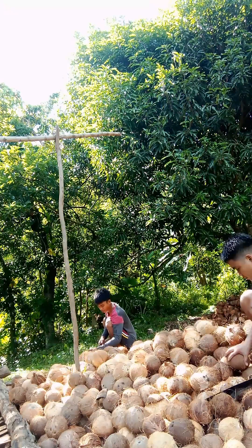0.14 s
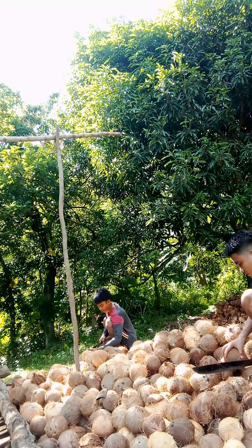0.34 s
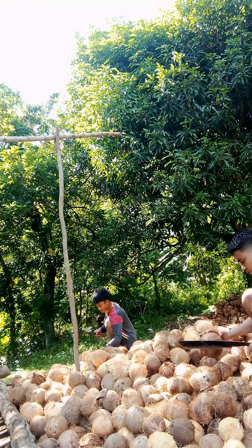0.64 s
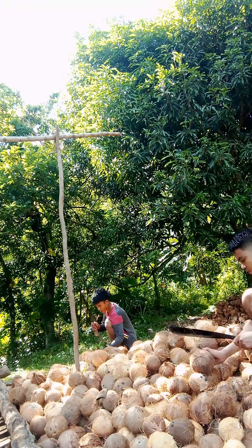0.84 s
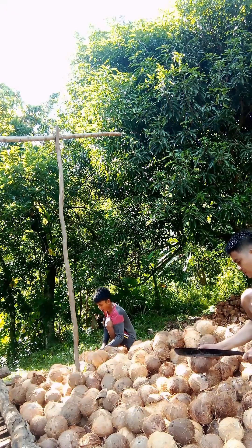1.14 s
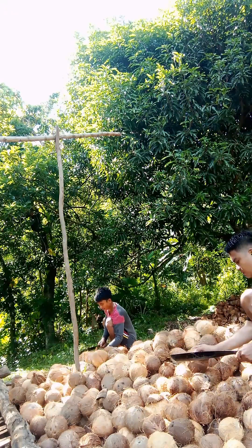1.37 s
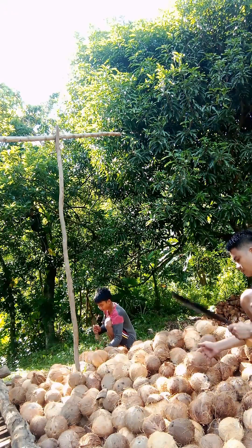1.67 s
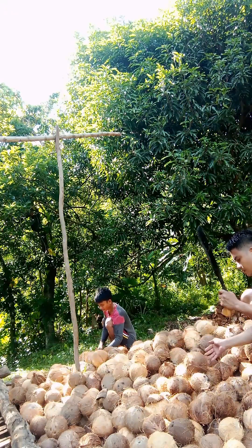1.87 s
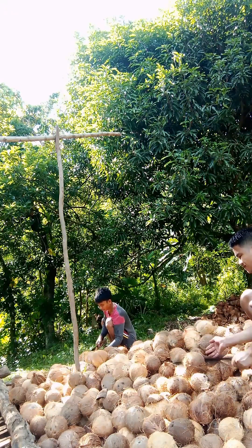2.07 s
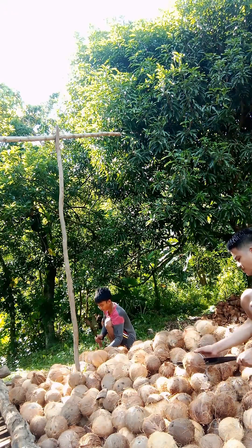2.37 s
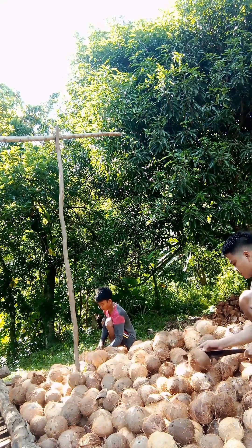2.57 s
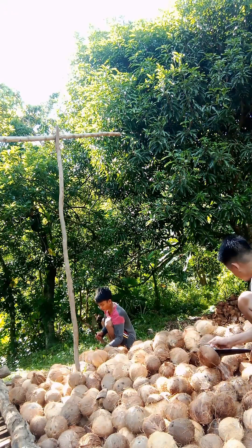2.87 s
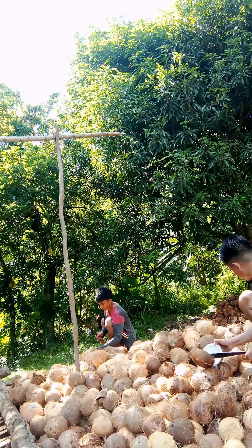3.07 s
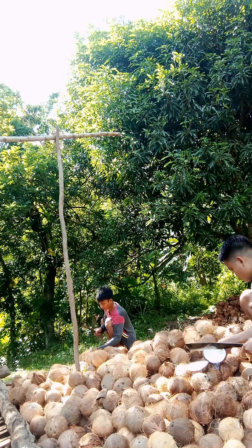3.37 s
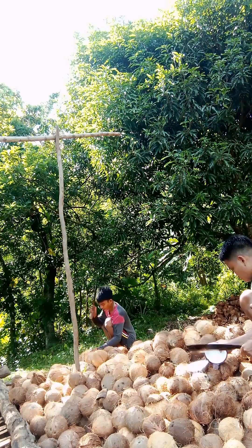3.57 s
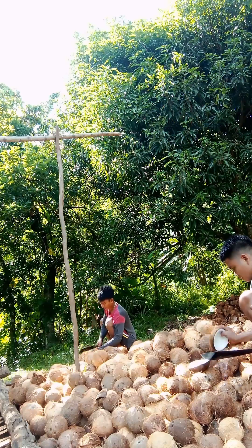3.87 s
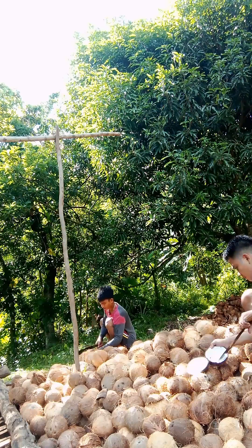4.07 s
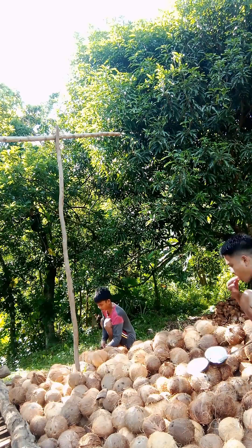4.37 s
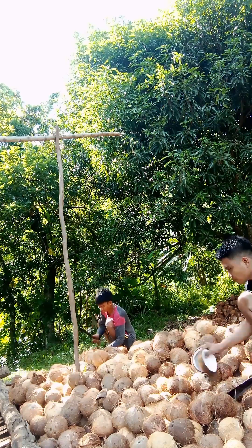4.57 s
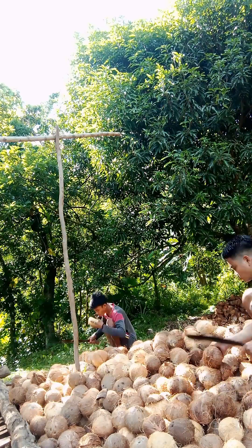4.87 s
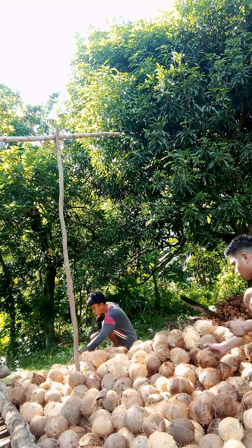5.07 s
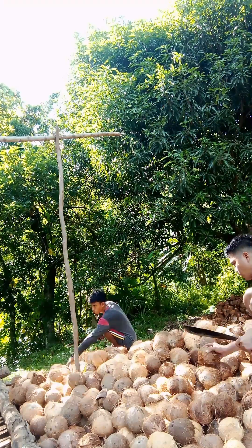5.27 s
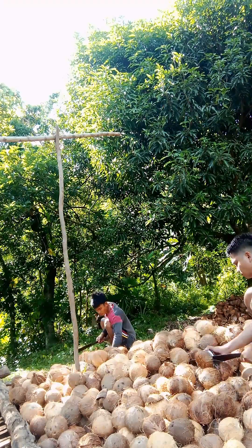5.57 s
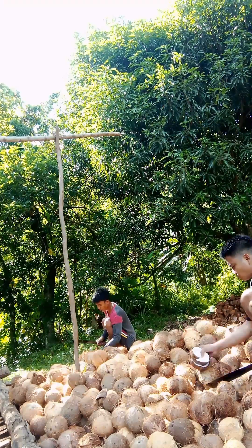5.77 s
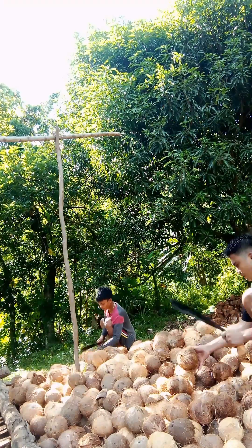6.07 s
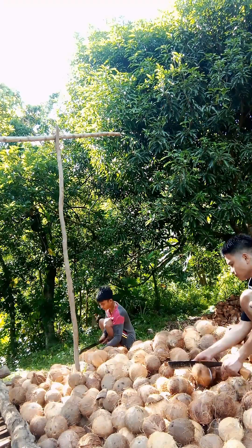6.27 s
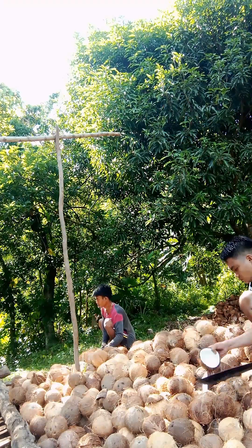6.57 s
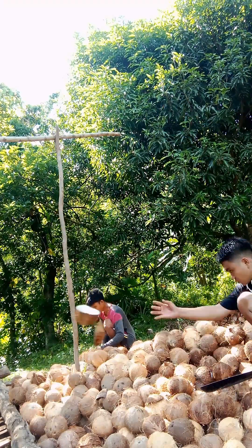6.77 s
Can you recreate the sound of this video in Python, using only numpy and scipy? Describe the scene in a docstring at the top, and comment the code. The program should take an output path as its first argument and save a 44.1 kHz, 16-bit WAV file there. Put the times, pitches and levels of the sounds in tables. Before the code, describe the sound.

In an open yard ringed by trees, knives chop husked coconuts with dry, hollow cracks at uneven intervals. Nuts thud and tumble on the heap, water trickles briefly, and leaves return a soft hissing echo. Around four seconds a tiny dropout leads to crowded, clipped knocks without full tails. Faint insects and rustle continue; the microphone is a few metres away, single-channel.

```python
"""Splitting coconuts in a yard

People split husked coconuts with long knives in a yard ringed by trees; nuts land and tumble on the heap.
Blows are noise bursts driving damped modes; the trees return each as a late, hissing noise echo.
Insects (noise bands), a distant bird (wavering tones), a trickle and drips fill the gaps.
After a short, nearly silent cut the playback skips ahead: blows and echoes come as clipped snatches,
over the same insects, bird, drips and hollow notes."""
import sys
import numpy as np
from scipy import signal
from scipy.fft import rfft, irfft
from scipy.io import wavfile
from scipy.ndimage import uniform_filter1d

SR = 44100
rng = np.random.default_rng(int(sys.argv[2]) if len(sys.argv) > 2 else 0)


def unload_audio(sound):
    """Save the sound as a 16-bit wav file, at the path given as the first command line argument."""
    columns = np.transpose(np.atleast_2d(sound))
    # keep every value between -1 and 1, then stretch to whole-number steps
    steps = np.round(np.clip(columns, -1, 1) * 32767)
    wavfile.write(sys.argv[1], SR, steps.astype(np.int16))


N = 305172

CUT_FROM_S, CUT_TO_S = 3.956, 3.987
KEPT_S, STOP_FADE_S = 0.017, 0.0089  # blow length after the cut; time constant of every abrupt stop


def gain_of(db):
    """Decibels to amplitude."""
    return 10 ** (np.asarray(db) / 20)


def evened(x):
    """Scales to an rms of one."""
    return x / np.sqrt(np.mean(x ** 2) + 1e-20)


def peaked(x):
    """Scales to a peak of one."""
    return x / (abs(x).max() + 1e-20)


def loudest(x):
    """Scales so that the loudest 300 samples (7 ms) have an rms of one."""
    return x / np.sqrt(uniform_filter1d(x ** 2, size=300).max() + 1e-20)


def add(mix, start_s, sound):
    """Adds a sound into the mix at a time, clipped to the end."""
    part = mix[round(start_s * SR):][:len(sound)]
    part += sound[:len(part)]


def coloured(x, hz, db):
    """Shapes a spectrum by straight dB lines on a log-frequency axis."""
    f = np.fft.rfftfreq(len(x), 1 / SR)
    shape_db = np.interp(np.log(f + 1), np.log(hz), db)
    return irfft(rfft(x) * gain_of(shape_db), len(x))


def band(x, lo_hz, hi_hz, skirt_db=-18):
    """One broad band with sloping sides, rms one."""
    corners_hz = [lo_hz / 2, lo_hz, hi_hz, hi_hz * 2, hi_hz * 4]
    return evened(coloured(x, corners_hz, [skirt_db, 0, -3, skirt_db - 10.5, -55]))


def ring(push, hz, t60_s):
    """One damped mode (two-pole resonator) driven by a push."""
    r = 10 ** (-3 / (t60_s * SR))
    return loudest(signal.lfilter([1], [1, -2 * r * np.cos(2 * np.pi * hz / SR), r * r], push))


def stopped(sound, length_s):
    """Fades a sound out abruptly after a given length."""
    over_s = np.maximum(np.arange(len(sound)) / SR - length_s, 0)
    return sound * np.exp(-over_s / STOP_FADE_S)


def wander(count, smooth):
    """Slow random curve, rms one: noise averaged over a number of samples."""
    return evened(uniform_filter1d(rng.standard_normal(count), size=smooth))


def chop(start_s, crack_db, crack_hz, shell_db, shell_hz, thud_db, thud_hz, tick_db, blade_db, echo_db):
    """A knife blow: the harder it lands, the deeper the knife bites and the shorter the nut rings."""
    hard, soft, per_db, hard_db = 0.83, 1.58, 0.1, -16  # length factors against crack level
    long = min(hard + per_db * (hard_db - crack_db), soft)
    return blow(start_s, thud_hz, thud_db, shell_hz, shell_db, crack_hz, crack_db, tick_db, blade_db, echo_db, long)


def blow(start_s, thud_hz, thud_db, shell_hz, shell_db, crack_hz, crack_db, tick_db, blade_db, echo_db, long):
    """Knife or nut strikes a nut: a soft push moves the body, splintering excites shell and blade."""
    # blade modes: mode_hz, relative_db, t60_s
    blade_modes = [(1626, 0, 0.037), (2250, -9, 0.056), (2842, -10, 0.038), (4021, -10, 0.034),
                   (5233, -13, 0.015), (6697, -18, 0.022), (8672, -12, 0.03), (9609, -19, 0.059),
                   (10730, -20, 0.043), (11850, -21, 0.043), (13000, -24, 0.057), (14240, -26, 0.039)]
    t = np.arange(4096) / SR
    long = max(long, .2)
    noise = rng.standard_normal(size=(4, len(t)))
    burst = (1 - np.exp(-t / 0.00027)) ** 2 * np.exp(-t / (0.0032 * long))
    push = np.diff((t / .0008) * np.exp(-t / 0.00071), prepend=0)

    thud = ring(push, thud_hz, 0.037 * long)

    husk = loudest(coloured(noise[3], [120, 300, 1200, 2400], [-21.0, 5.5, 3.5, -50.5]) * burst ** 0.3)
    shell = loudest(ring(noise[0] * burst, shell_hz, 0.016 * long) + 0.58 * husk)

    # torn fibres fill the spectrum around the crack
    fibre_noise = coloured(noise[0], [400, 1300, 4000, 5500, 9000], [-37.5, 5.0, 5, -30.5, -46.5])
    fibres = loudest(fibre_noise * burst)
    crack_push = np.diff(noise[1], prepend=0) * burst
    crack = loudest(ring(crack_push, crack_hz, 0.011 * long) + 0.86 * fibres)

    tick = loudest(coloured(noise[2], [3780, 5590, 9190, 16100], [-30, 5.0, -14, -12.5]) * burst)
    blade_push = np.diff(noise[2], prepend=0) * burst
    blade = loudest(sum(gain_of(db) * ring(blade_push, hz, t60_s) for hz, db, t60_s in blade_modes))

    levels_db = thud_db, shell_db, crack_db, tick_db, blade_db
    near = sum(gain_of(db) * part for db, part in zip(levels_db, (thud, shell, crack, tick, blade)))

    # countless leaves blur the blow into its broad colour; a trace of the rings survives
    leaves = trees()
    echo_colour_db = [thud_db, shell_db, crack_db, crack_db - 4.5, tick_db]
    blurred = coloured(leaves, [250, 900, 1800, 4200, 6500], echo_colour_db)
    rings = .11 * near + 0.25 * gain_of(blade_db) * blade
    trace = signal.fftconvolve(rings, leaves)[:len(leaves)]
    out = gain_of(echo_db) * (12.0 * blurred + trace)
    add(out, 0, near)
    return stopped(out, CUT_FROM_S - start_s if start_s < CUT_FROM_S else KEPT_S)


def trees():
    """Leaf echoes: a gap, a swell as more crowns answer, then each band dies at its own speed."""
    # echo bands: band_hz, relative_db, t60_s
    echo_bands = [(100, -15.5, 0.3), (400, 0, 0.42), (1260, -4.5, 0.42), (3350, 3.5, 0.36), (7320, 0, 0.41),
                  (15000, -8.5, 0.26)]
    hz, db, t60_s = np.transpose(echo_bands)
    f, t, z = signal.stft(rng.standard_normal(size=30000), SR, nperseg=256)
    log_f = np.log(f + 1)
    level_db = np.interp(log_f, np.log(hz), db)[:, None]
    decay_s = np.interp(log_f, np.log(hz), t60_s)[:, None]
    tail = signal.istft(z * gain_of(level_db - 60 * t / decay_s), SR, nperseg=256)[1]
    late_s = np.maximum(np.arange(len(tail)) / SR - .012, 0)
    tail = tail * (1 - np.exp(-late_s / .025))
    return tail / np.linalg.norm(tail)


def landing(start_s, thud_db, thud_hz, shell_db, echo_db):
    """A whole nut drops on the others: a blow with little crack or tick and no blade."""
    shell_hz, crack_hz, long = 605, 2430, 1.13
    crack_db, tick_db = shell_db - 12, shell_db - 33.5
    return blow(start_s, thud_hz, thud_db, shell_hz, shell_db, crack_hz, crack_db, tick_db, -np.inf, echo_db, long)


def clatter(count, grain_db):
    """Uneven noise: dense small knocks of scattered size."""
    return gain_of(grain_db * wander(count, smooth=130)) * rng.standard_normal(count)


def tumble(level_db, hold_s, low_db, high_db):
    """Rolling nuts knock low, rattle in the shell range and scrape above it."""
    rise_s, fall_db_per_s = 0.0095, 121.5
    t = np.arange(SR // 2) / SR
    knocks = clatter(len(t), grain_db=3.5)
    low, shell, high = band(knocks, 110, 340), band(knocks, 492, 1100), band(knocks, 1800, 3900)
    parts = shell + gain_of(low_db) * low + gain_of(high_db) * high
    fall = gain_of(level_db - fall_db_per_s * np.maximum(t - hold_s, 0))
    return fall * np.minimum(t / rise_s, 1) * parts


def snatch(length_s, level_db, low_db, bright, fall_db_per_s=150):
    """A piece of clatter or hissing echo between skips: banded noise fades in, sinks, stops abruptly."""
    clatter_db, hiss_db = (-1, -3.5, -43.5), (-8.5, -2, -6)  # middle, high, top band
    edges_hz = (90, 290), (450, 1090), (1600, 4300), (5200, 10500)
    t = np.arange(8192) / SR
    noise = clatter(len(t), grain_db=0.5)
    bands_db = [low_db] + [dull + bright * (hiss - dull) for dull, hiss in zip(clatter_db, hiss_db)]
    parts = sum(gain_of(db) * band(noise, *edges) for db, edges in zip(bands_db, edges_hz))
    envelope = gain_of(level_db - fall_db_per_s * t) * (1 - np.exp(-t / 0.0019))
    return stopped(envelope * parts, length_s)


def note(peak_db, hz, length_s, waver=0.038):
    """A short, nearly pure tone that swells and stops; waver is its rms relative pitch drift."""
    count = round(max(length_s, .002) * SR)
    drift = waver * wander(9000, smooth=400)[:count]
    phase = 2 * np.pi * np.cumsum(hz * (1 + drift)) / SR
    return gain_of(peak_db) * np.sin(phase) * signal.windows.tukey(len(drift), .85)


def trickle():
    """Water running from a split nut: many tiny drops of scattered size over a faint wet hiss."""
    # flow: time_s, level_db
    flow = [(2.738, -80), (2.8, -67.5), (3.1, -60.5), (3.419, -66), (3.5, -100)]
    s, db = np.transpose(flow)
    t = np.arange(s[0], s[-1], 1 / SR)
    chance, size, hiss = rng.random(len(t)), rng.exponential(size=len(t)), rng.standard_normal(len(t))
    drops = evened((chance < 140 / SR) * gain_of(6.9 * size))  # about 140 drops per second
    return s[0], gain_of(np.interp(t, s, db)) * band(0.82 * drops + hiss, 2500, 5400)


def drip(peak_db, hz):
    """A drop or chip lands: a decaying noise splash drives one short mode."""
    splash = rng.standard_normal(size=800) * np.exp(-np.arange(800) / 200.0)
    return gain_of(peak_db) * peaked(ring(splash, hz, 0.0041))


def yard():
    """Distant rustle with a lumpy low end, and thin throbbing noise bands of insect song."""
    # rustle spectrum: hz, relative_db_per_hz
    rustle_spectrum = [(18, -46), (30, -8.5), (115, 2.5), (350, -7), (420, -11.5), (1180, -20.5),
                       (2470, -22), (7280, -32.5), (8450, -34), (9480, -53.5), (15200, -30), (16500, -56.5)]
    # insect bands: centre_hz, half_width_hz, level_db (before the throb)
    insects = [(8230, 650, -79), (10700, 1500, -87)]
    rustle_db = -60.5
    hz, db = np.transpose(rustle_spectrum)
    out = gain_of(rustle_db) * evened(coloured(rng.standard_normal(N), hz, db))
    for f, width, level_db in insects:
        throb = gain_of(2.2 * wander(N, smooth=600))
        song = coloured(rng.standard_normal(N), [f - width, f, f + width], [-25, 0, -25])
        out = out + gain_of(level_db) * throb * evened(song)
    return out


def scene():
    """All sources summed into one channel."""
    # knife blows: start_s, crack_db, crack_hz, shell_db, shell_hz, thud_db, thud_hz, tick_db, blade_db,
    # echo_db (relative)
    chops = [(.184, -26.5, 1730, -51, 840, -30, 209, -53, -59, 10),
             (.191, -23, 3690, -20.5, 960, -31.5, 215, -39.5, -49, 15.5),
             (.222, -22.5, 3920, -22, 860, -29, 373, -60, -52, -4),
             (.549, -44, 3500, -37, 900, -50, 240, -54, -66, -3),
             (.596, -32, 2860, -25.5, 1125, -35, 240, -54, -54, 7),
             (1.072, -34, 2370, -36.5, 565, -43.5, 337, -50, -41.5, -2.5),
             (1.131, -30.5, 1660, -32, 910, -31, 244, -30.5, -33, -1.7),
             (1.748, -63.5, 1480, -51, 650, -65, 172, -75, -74, 14.5),
             (1.782, -53, 1610, -48.5, 904, -55.5, 285, -63, -78, 2),
             (1.894, -35.5, 2340, -35.5, 820, -40, 268, -41.5, -41.5, 3),
             (1.907, -33, 1780, -22, 650, -27, 241, -45, -40, -3),
             (2.122, -12.5, 3250, -20, 726, -28, 303, -32.5, -52, 2),
             (2.14, -28, 2730, -26, 1125, -29, 189, -33, -51, 7),
             (2.528, -39, 2270, -45, 865, -47, 272, -47, -62, 11),
             (2.541, -30.5, 2360, -25, 806, -26.5, 239, -33, -43, -1.5),
             (2.997, -52, 3000, -56, 800, -60, 200, -51, -66, -8),
             (3.014, -29, 2185, -32.5, 800, -43, 206, -37.5, -45, -13),
             (3.277, -39.5, 1920, -37.5, 903, -38.5, 258, -52, -47, -3.5),
             (3.471, -37.5, 2210, -38, 657, -44, 101, -51.5, -50, 5),
             (3.655, -27, 2760, -23, 803, -29, 383, -34, -49, -10.5),
             (3.752, -52.5, 2580, -52, 1110, -68, 103, -54.5, -70, -12),
             (3.811, -16, 2180, -23.5, 860, -27.5, 182, -29, -55, 3.5),
             (4.089, -33.5, 1920, -29.5, 470, -24.5, 305, -33.5, -51, -8.5),
             (4.398, -44, 1510, -39.5, 663, -44.5, 118, -54.5, -65.5, -6),
             (4.51, -52.5, 2280, -57.5, 1270, -65, 147, -72.5, -71, -12.5),
             (4.643, -38, 2700, -36.5, 650, -47, 295, -39, -55, -16),
             (4.892, -53, 1490, -30, 940, -52, 254, -73.5, -64, 5),
             (4.926, -24, 2520, -29.5, 732, -29.5, 455, -43, -39, -5),
             (5.108, -52, 3780, -72, 536, -73, 124, -58.5, -75, 3),
             (5.174, -14, 2890, -25.5, 458, -21.5, 132, -24.5, -43, 7),
             (5.526, -21.5, 3630, -33, 830, -37, 342, -58, -50, 15),
             (5.759, -46.5, 2300, -42.5, 1156, -40, 172, -56, -54, -12),
             (5.962, -30, 1780, -30, 810, -32.5, 240, -61.5, -56.5, -16),
             (5.983, -48, 1570, -29.5, 1200, -45, 345, -50, -55, -10),
             (6.175, -16, 2850, -26, 757, -27, 239, -25, -30.5, 10),
             (6.297, -29.5, 2930, -32.5, 650, -41.5, 240, -52, -48, -9),
             (6.502, -43, 2240, -39.5, 670, -37.5, 186, -53, -62, -13),
             (6.652, -52, 3770, -54, 650, -66, 183, -48, -70, -6),
             (6.857, -37, 1480, -28, 740, -28, 172, -61, -51, -20)]
    # whole nuts landing on the heap: start_s, thud_db, thud_hz, shell_db, echo_db (relative)
    landings = [(.784, -22, 295, -27.5, 4.5), (1.458, -22, 265.5, -47.5, -7.5),
                (1.663, -44.5, 150.4, -69, -9.5), (1.995, -37.5, 235, -39.5, -6.5),
                (4.827, -28, 183, -34, -8), (5.342, -39.5, 184, -56.5, -6), (6.058, -18, 225, -31, 10),
                (6.108, -26.5, 230, -31, -9)]
    # clatter and echo pieces: start_s, length_s, level_db, low_db (relative), bright (0 clatter, 1 hiss)
    snatches = [(3.988, 0.021, -45.5, 1, 0.82), (4.206, 0.033, -59.5, 2.5, 0.95),
                (4.25, 0.025, -37.5, -16.5, 1), (4.297, 0.01, -44.5, -4, 0.87),
                (4.401, 0.014, -50, -9, 0.85), (4.55, 0.044, -58.5, 7.5, 0.11), (4.659, 0.029, -52, 0, 1),
                (4.757, 0.02, -24.5, -15.5, 0.41), (4.79, 0.071, -39, -6, 0.045),
                (4.861, 0.016, -41.5, 3, .1), (4.911, 0.028, -44, 7, 0.25), (5.056, .027, -63.5, 8, 1),
                (5.123, 0.019, -62, 0.5, 1), (5.264, .026, -65.5, -3, 0.98), (5.35, .014, -58, 4, .7),
                (5.379, 0.015, -53.5, 8.5, 1), (5.45, 0.019, -62.5, -11, 0.91),
                (5.525, 0.018, -22, -18, 0.067), (5.549, 0.1, -43, -6, 0.23), (5.605, 0.018, -38, -3, 0.38),
                (5.656, 0.022, -35.5, -8, 0.97), (5.688, 0.025, -57.5, 11, 0.4),
                (5.735, 0.023, -66, 3, .95), (5.809, 0.0074, -58, -26, 0.95),
                (5.843, 0.017, -40, -12, 0.63), (5.873, 0.0063, -45, -1, 0.071),
                (5.909, 0.036, -67, 15, 0.39), (5.967, 0.042, -34, -9.5, .1),
                (6.029, 0.024, -46.5, 4, 0.043), (6.09, .015, -54.5, 0, 1), (6.114, 0.019, -47, 1, .9),
                (6.247, 0.019, -51, -13, 0.82), (6.285, 0.016, -39.5, -17, 0.54),
                (6.308, 0.0079, -54, -5, 0.44), (6.395, 0.016, -45.5, -16, 0.97),
                (6.423, 0.022, -64, -14, 0.83), (6.509, 0.01, -40, -10, 0.89),
                (6.585, 0.02, -55.5, 0, 0.97), (6.659, 0.012, -55, 3, .7), (6.717, 0.01, -56.5, -18, .6),
                (6.744, 0.017, -56, 0.5, 1), (6.868, .06, -33, -7.5, 0.12)]
    # nuts rolling down the heap: start_s, level_db, hold_s, low_db, high_db (both relative to shell range)
    tumbles = [(.188, -30, .015, -10.5, -0.5), (.218, -25.5, 0.024, -6, -2), (.455, -45.5, 0.063, -1.5, -7),
               (.59, -34.5, 0.025, -7, -1), (.785, -38.5, 0.074, -0.5, -4.5)]
    # hollow notes from opened shells: start_s, peak_db, pitch_hz, length_s
    hollow_notes = [(2.444, -35, 663, 0.031), (2.862, -54.5, 602, 0.04), (2.992, -42.5, 780, 0.021),
                    (4.574, -50, 554, 0.028), (5.005, -55.5, 816, 0.017), (6.284, -19, 643, 0.025),
                    (6.705, -48, 707, 0.047)]
    # distant bird calls: start_s, length_s, pitch_hz, peak_db
    bird_calls = [(0, .11, 2480, -66), (4.015, .028, 2300, -62), (5.235, .03, 2150, -66),
                  (5.31, .022, 2150, -68)]
    # brief high rings of a blade: start_s, length_s, pitch_hz, peak_db
    glints = [(1.085, .045, 6700, -58), (1.152, .03, 14200, -50), (4.932, .02, 6700, -48),
              (5.125, .02, 7700, -62), (5.7, .024, 3380, -58), (5.7, .024, 6610, -53),
              (5.7, .024, 7640, -51)]
    # drops and chips landing: start_s, peak_db, pitch_hz
    drips = [(1.018, -48, 3300), (1.794, -45, 2720), (2.775, -43, 4070), (2.8404, -44.5, 3260),
             (2.885, -58, 3060), (3.128, -45, 2540), (3.198, -41, 2320), (3.236, -45, 3440),
             (3.3733, -49, 3800), (3.3905, -43.5, 2660), (3.402, -52, 5000), (3.685, -42, 2600),
             (3.7262, -54, 2330), (5.74, -38, 3870), (5.8087, -40.5, 2580), (6.6146, -42.5, 3610),
             (6.8308, -47.5, 2090)]

    mix = yard()
    for table, source in ((chops, chop), (landings, landing)):
        for row in table:
            add(mix, row[0], source(*row))
    for table, source in ((snatches, snatch), (tumbles, tumble), (hollow_notes, note), (drips, drip)):
        for start_s, *settings in table:
            add(mix, start_s, source(*settings))
    for start_s, length_s, hz, peak_db in bird_calls + glints:
        add(mix, start_s, note(peak_db, hz, length_s, waver=0.0055))
    add(mix, *trickle())
    return mix[None]


def record(dry):
    """The microphone loses the deepest bass; then the nearly silent cut and a steep treble limit."""
    dry = signal.lfilter(*signal.butter(2, 55., "high", fs=SR), dry)
    t = np.arange(N) / SR
    outside_s = np.maximum(CUT_FROM_S - t, t - CUT_TO_S)
    cut = np.clip(outside_s / 0.0017, .02, 1)
    treble_limit = signal.firwin(255, 15800, window=("kaiser", 9), fs=SR)
    return signal.oaconvolve(dry * cut, treble_limit[None], "same")


dry = scene()
out = record(dry)
unload_audio(out)
```